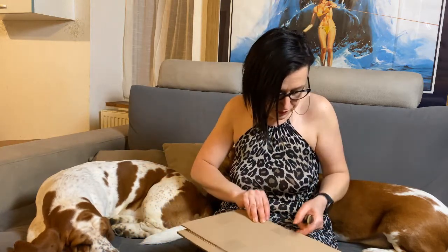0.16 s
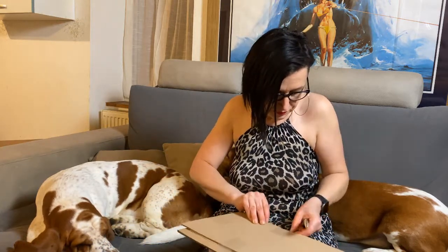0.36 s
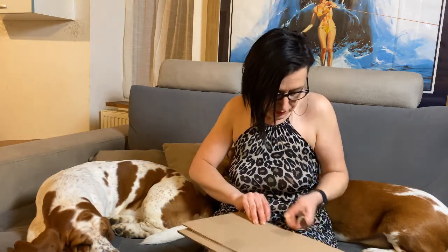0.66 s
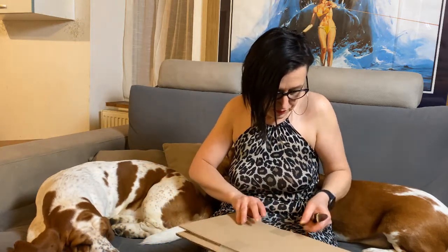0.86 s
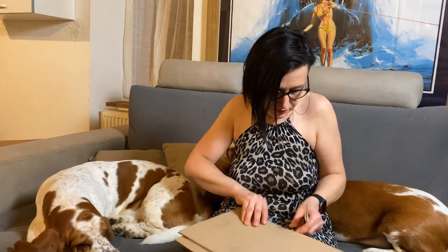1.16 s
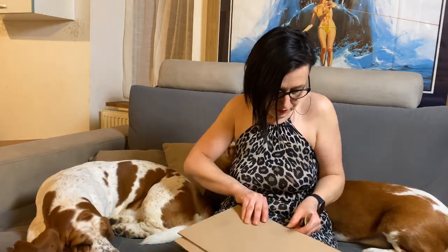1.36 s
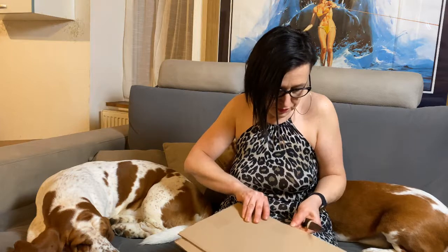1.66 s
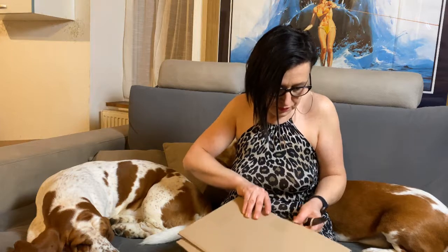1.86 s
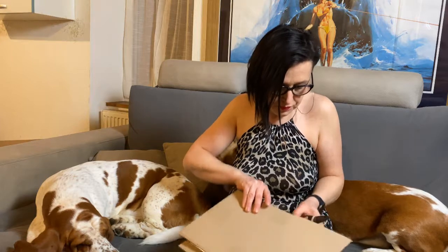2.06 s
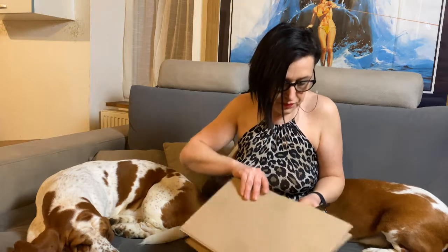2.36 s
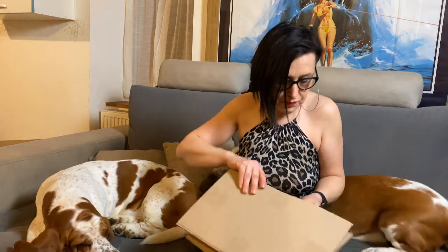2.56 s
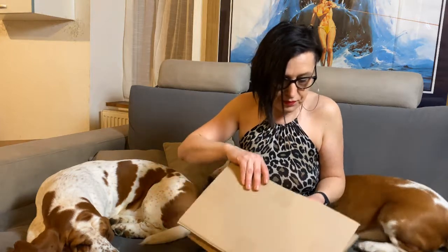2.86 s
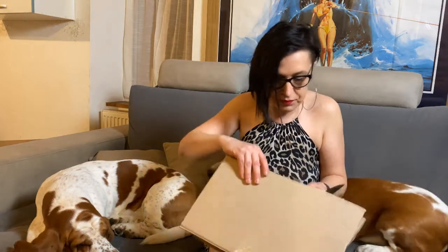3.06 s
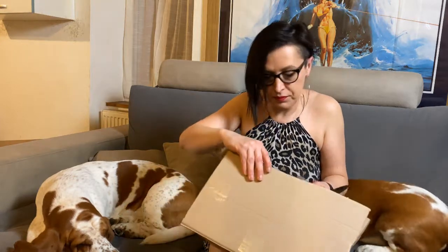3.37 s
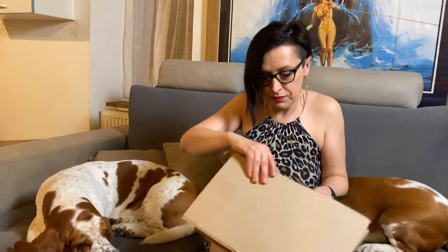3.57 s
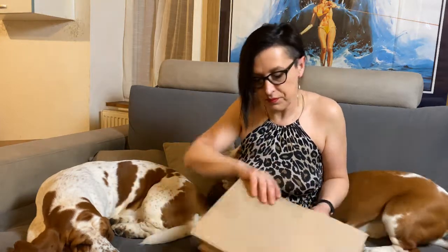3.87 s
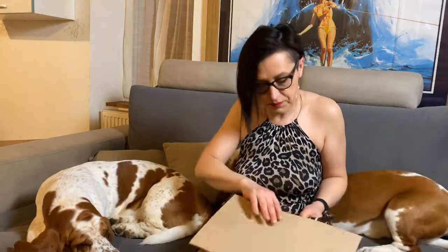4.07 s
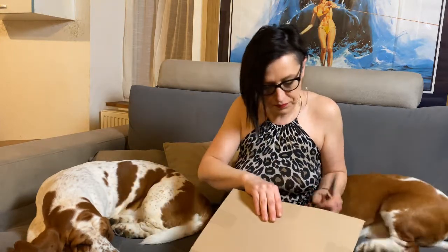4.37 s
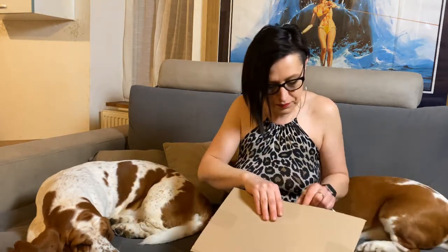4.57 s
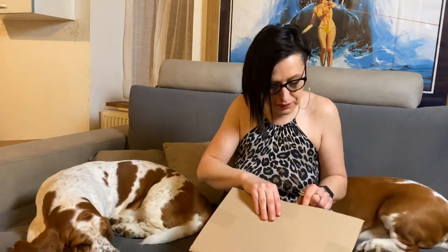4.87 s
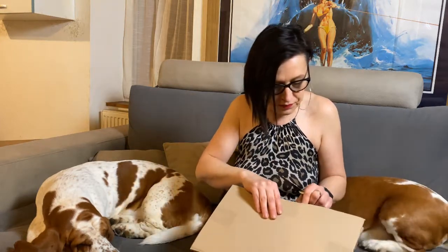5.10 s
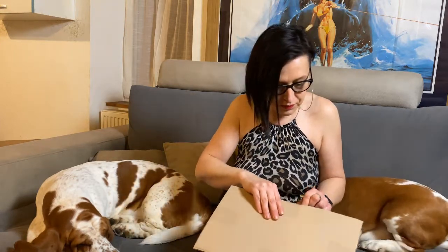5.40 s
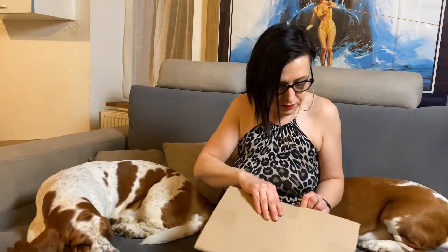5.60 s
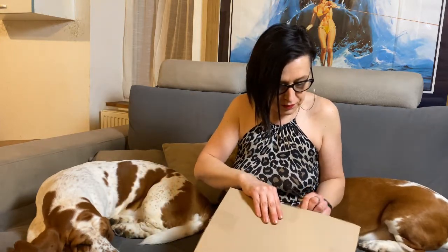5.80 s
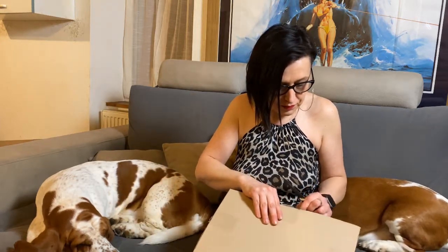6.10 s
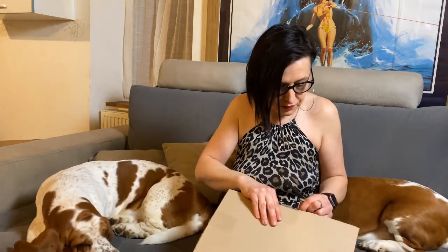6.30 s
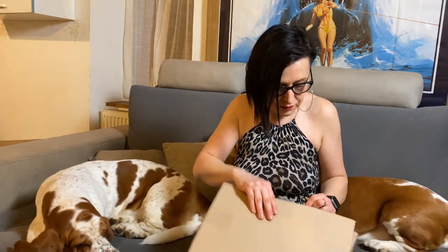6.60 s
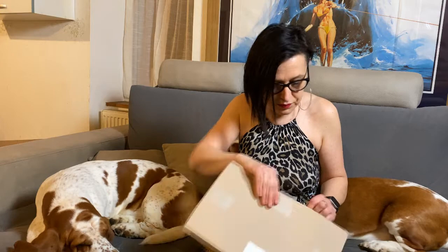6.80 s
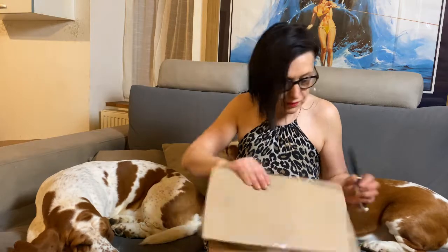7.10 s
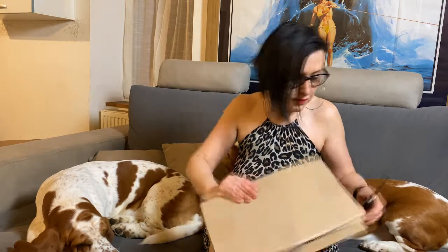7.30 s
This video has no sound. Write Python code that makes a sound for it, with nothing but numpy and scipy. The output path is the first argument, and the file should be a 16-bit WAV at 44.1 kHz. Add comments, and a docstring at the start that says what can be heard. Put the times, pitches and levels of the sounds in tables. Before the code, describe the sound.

A flat cardboard package is worked open on a lap. Small dry ticks lead to a sharp tape snap, then scraping and tearing grow into a busy, loud burst around two and a half seconds with low thumps. A quieter gap follows, then scattered rubs and hollow taps, and one strong woody pop late on. Soft-furnished living room, phone a metre or two away.

```python
"""Opening flat cardboard on the lap

A blade and fingers snap tape and fibres in a soft-furnished living room, a metre or two from a phone's microphones.
Snaps and rips are bursts and board rings; rubbing is clumped grains; flexing and the floor are coloured noise.
Air pockets pip and knees thump as fading sines; a near bounce, diffuse echo tails and two microphone ports follow."""
import sys
import numpy as np
from scipy import signal
from scipy.fft import rfft, irfft, next_fast_len
from scipy.io import wavfile

SR = 44100
rng = np.random.default_rng(int(sys.argv[2]) if len(sys.argv) > 2 else 0)


def output_pcm(signal):
    """Save a mono or channel-first signal as 16-bit PCM at the path in sys.argv[1].

    Samples are clipped to [-1, 1] before scaling.
    """
    pcm = np.clip(np.atleast_2d(signal).T, -1, 1) * 32767
    wavfile.write(sys.argv[1], SR, np.round(pcm).astype(np.int16))


N = 328545

FAVOUR_DB = 36   # loss per octave away from the favoured board mode


def from_db(db):
    """Decibels to gain."""
    return 10 ** (np.asarray(db) / 20)


def rms_one(x):
    """Scale to rms 1."""
    return x / np.sqrt(np.mean(x ** 2) + 1e-30)


def in_time(rows):
    """Interpolate the columns after the time column at every sample."""
    s, *columns = np.transpose(rows)
    return [np.interp(np.arange(N) / SR, s, c) for c in columns]


def at_hz(points, hz, order=1):
    """Read one column of a spectrum table on a log frequency axis."""
    points = np.array(points)
    return np.interp(np.log(np.maximum(hz, 1)), np.log(points[:, 0]), points[:, order])


def coloured(x, spectrum):
    """Filter x with a spectrum table and scale it to rms 1."""
    size = next_fast_len(N)
    gain = from_db(at_hz(spectrum, np.fft.rfftfreq(size, 1 / SR)))
    return rms_one(irfft(rfft(x, size) * gain, size)[..., :N])


def band(x, low_hz, high_hz):
    """Band-pass."""
    return signal.sosfilt(signal.butter(2, [low_hz, high_hz], "band", fs=SR, output="sos"), x)


def drift(rate_hz):
    """Slow random wander of rms 1, made at every 40th sample and interpolated."""
    r = np.exp(-2 * np.pi * rate_hz * 40 / SR)
    noise = rng.standard_normal(N // 40 + 2002)
    slow = signal.lfilter([1], [1, -2 * r, r * r], noise)[2000:]   # skip the filter's start
    return np.interp(np.arange(N) / 40, np.arange(len(slow)), rms_one(slow))


def ring(clicks, hz, t60_s):
    """A two-pole resonator: each unit click starts a fading sine of height 1."""
    r = from_db(-60 / (t60_s * SR))
    w = 2 * np.pi * hz / SR
    return signal.lfilter([0, np.sin(w)], [1, -2 * r * np.cos(w), r * r], clicks + 1e-18)


def add(out, s, sound):
    """Lay a sound into the track at s seconds."""
    i = max(round(s * SR), 0)
    out[..., i:i + sound.shape[-1]] += sound[..., :N - i]


def grains(per_s, spread_db, clump_db):
    """Tiny fibre slips as clicks at random moments, in clumps, of uneven size."""
    sizes = from_db(spread_db * np.minimum(rng.exponential(1, N), 5)) * rng.choice([-1, 1], N)
    draw = rng.random(N)
    chance = per_s * from_db(clump_db * drift(25)) / SR
    return sizes * (draw < chance)


# Strokes of sheet on sheet, levels before the rubbing trims; hum and hiss are relative to the rustle:
# peak_s, rustle_db, hum_db, hiss_db, rise_s, fade_s (rise and fade each span STROKE_RANGE_DB)
SHEET_STROKES = [(0.158, -54, -7, -25, 0.035, 0.042), (0.27, -54, 3, -23, 0.034, 0.11),
                 (0.509, -56, -7, -8, 0.015, 0.14), (0.612, -54, 5, -4, 0.015, 0.035),
                 (0.678, -56.5, 13.5, 8.5, 0.023, .06), (0.76, -34.5, -3.5, -15.5, 0.016, 0.066),
                 (0.982, -51.5, -13, -18, 0.26, 0.1), (1.155, -55, -5, -16.5, 0.13, 0.39),
                 (1.323, -53.5, -2, -20, 0.099, 0.15), (1.424, -48.5, -2.5, -21, .047, .035),
                 (1.519, -55.5, -2, -16, 0.024, 0.19), (1.62, -50, -3, 3, 0.021, 0.028),
                 (1.699, -36, -6, -14, .05, 0.11), (1.91, -48, -7, -10, 0.022, 0.35),
                 (2.01, -56, 1, -13, 0.022, 0.1), (2.147, -52, 4.5, -25, 0.029, 0.061),
                 (2.214, -40.5, -22, -12.5, 0.024, 0.087), (2.4, -45.5, -25, -18, .12, 0.42),
                 (2.53, -23.5, -6.5, -15.5, 0.035, 0.068), (2.578, -40.5, -7, -22, .05, 0.18),
                 (2.738, -51, -2, -11.5, 0.082, 0.19), (2.891, -45.5, -4, -17, 0.03, 0.047),
                 (3.297, -60, -7.5, -21.5, 0.01, 0.19), (3.394, -58.5, -17, -18.5, .01, 0.3),
                 (3.57, -56.5, -31.5, -31, .027, 0.061), (3.72, -60, -8, -8, .03, 0.073),
                 (3.896, -57, 3.5, -4, 0.13, 0.26), (3.974, -53.5, 8.5, -20, 0.039, 0.039),
                 (4.09, -39, 0.5, -33, 0.026, 0.062), (4.176, -35, -3.5, -20, 0.068, .035),
                 (4.666, -62.5, -1.5, -21.5, 0.21, .04), (4.779, -33.5, -5, -18, 0.026, 0.056),
                 (5.078, -52, 0, -29, 0.011, 0.035), (5.199, -39.5, -3, -22, 0.047, 0.019),
                 (5.292, -59.5, -13, -9.5, 0.022, 0.14), (5.535, -54, -5, -21, .1, 0.15),
                 (5.619, -57.5, -4.5, -21, 0.019, .055), (5.865, -46.5, -7, -15.5, 0.067, 0.15),
                 (6.09, -52.5, -8, -16, .15, 0.11), (6.147, -42, -12.5, -16.5, 0.019, 0.13),
                 (6.373, -54, -16, -23, .05, 0.046), (6.427, -56, -7, -11.5, 0.028, 0.47),
                 (6.61, -37.5, -2, -11, 0.027, 0.12), (6.768, -47.5, -4, -26, 0.024, 0.17),
                 (6.86, -41.5, -14, -17, .035, 0.09), (6.89, -50, -2, -19, .05, 0.079),
                 (7.074, -49.5, -2.5, -19, .05, 0.42), (7.146, -56, -12, -15.5, 0.26, 0.023),
                 (7.314, -52, -11, -22.5, .012, 0.18), (7.44, -52.5, -23.5, -18, 0.036, .1)]
# Hands at work between strokes, levels before the rubbing trims; the hum centre is where the board is held:
# time_s, rustle_db, hum_centre_hz
HAND_WORK = [(0.0, -66.5, 630), (0.49, -67, 730), (0.75, -73, 950), (1.07, -66.5, 635), (1.49, -85, 730),
             (1.85, -61.5, 830), (2.2, -63, 1220), (2.48, -43, 960), (2.7, -64, 1120), (2.96, -56, 760),
             (3.23, -62, 1155), (3.3, -71.5, 984), (3.66, -85, 700), (3.76, -57.5, 960), (4.07, -51.5, 835),
             (4.29, -48.5, 900), (4.43, -55, 626), (4.51, -80, 600), (4.73, -88, 910), (4.85, -55, 1017),
             (5.1, -61.5, 905), (5.28, -55.5, 990), (5.77, -74.5, 800), (5.98, -69, 842), (6.32, -73, 980),
             (6.56, -68, 1050), (6.75, -56, 810), (7.04, -65, 797), (7.15, -61.5, 857), (7.2, -88, 720),
             (7.3, -74, 760), (7.45, -64, 890)]
STROKE_RANGE_DB = 20
STROKES_END_S, END_FADE_S = 7.15, 0.023   # earlier strokes die away quickly from here
HANDLING_HUM_DB, HANDLING_HISS_DB = -7, -20   # relative to the handling rustle


def rub_levels():
    """Rustle, hum and hiss in dB: rising and fading strokes add their power to the handling."""
    t = np.arange(0, N, 44) / SR   # coarse steps, about 1 ms
    s, db, hum_db, hiss_db, rise, fade = np.transpose(SHEET_STROKES)[:, :, None]
    rising = (s - t) / np.maximum(rise, .004)
    fading = (t - s) / np.maximum(fade, .004)
    shape_db = db - STROKE_RANGE_DB * np.where(t < s, rising, fading)
    ending = np.maximum(t - STROKES_END_S, 0) / END_FADE_S
    shape_db = shape_db - STROKE_RANGE_DB * (s < STROKES_END_S) * ending
    power = [np.sum(from_db(shape_db + part_db) ** 2, axis=0) for part_db in (0, hum_db, hiss_db)]
    strokes = [np.interp(np.arange(N) / SR, t, p) for p in power]
    parts_db = np.array([[0], [HANDLING_HUM_DB], [HANDLING_HISS_DB]])
    handling = from_db(in_time(HAND_WORK)[0] + parts_db) ** 2
    return 10 * np.log10(handling + strokes)


# Modes of the cardboard sheet: mode_hz, level_db, t60_s
BOARD_MODES = [(330, -17, 0.073), (467, 7.5, 0.015), (610, 4, 0.035), (815, -2, 0.035), (989.5, 0, 0.031),
               (1187, 4, 0.02), (1474, 1, 0.025)]
# Relative colour of the rubbing rustle: frequency_hz, level_db
RUSTLE_COLOUR = [(590, -33.5), (1000, -12), (1220, -8), (1680, -6), (2240, 0), (2840, -6), (3620, -4.5),
                 (4850, -8.5), (7000, -18), (9100, -35), (15400, -120)]
HUM_RING = .6   # share of the ring time left under the fingers


def rubbing(rustle_db, hum_db, hiss_db):
    """Dense slips rustle and hiss, lone fibres crackle, sparser slips knock modes near the hold."""
    hum_hz = in_time(HAND_WORK)[1]
    slips = grains(3000, spread_db=0.5, clump_db=4.5)
    rustle = coloured(slips, RUSTLE_COLOUR) * from_db(rustle_db - 6.0 + 2.8 * drift(6.7))
    fine_slips = slips + grains(5000, spread_db=-2.0, clump_db=6.0)
    hiss = rms_one(band(fine_slips, 5300, 11000)) * from_db(hiss_db + 9.5)
    knocks = grains(900, spread_db=2.2, clump_db=5.0)
    hum = np.zeros(N)
    for k, (hz, mode_db, t60) in enumerate(BOARD_MODES):
        near_db = -FAVOUR_DB * np.abs(np.log2(hz / hum_hz))
        mode = rms_one(ring(np.roll(knocks, k), hz, HUM_RING * t60))
        hum += from_db(mode_db + near_db) * mode
    lone_fibres = grains(240, spread_db=3.5, clump_db=7.0)
    crackle = rms_one(band(lone_fibres, 750, 2500)) * from_db(rustle_db - 14.5)
    return from_db(-1.5) * (rustle + crackle + hiss + hum * from_db(hum_db - 6.5))


# The sheet flexing and pushing air: time_s, level_db
FLEX_LEVELS = [(0.0, -67.5), (0.77, -69), (1.0, -74.5), (1.31, -68), (1.72, -72.5), (1.84, -64),
               (2.45, -71.5), (2.59, -55), (2.76, -67.5), (2.86, -56.5), (3.11, -68.5), (3.46, -88.5),
               (3.9, -78), (4.23, -69), (4.42, -60.5), (4.54, -65.5), (4.85, -77), (5.23, -73.5),
               (6.0, -82.5), (6.49, -75.5), (6.6, -56.5), (6.81, -59), (7.14, -77), (7.45, -67.5)]
# Relative colour of the flexing noise: frequency_hz, level_db
FLEX_SPECTRUM = [(15, -19.5), (25, -33), (59, -2.5), (114, -4), (314, -11), (370, -15.5), (500, -13),
                 (650, -39.5), (1100, -120)]


def flexing():
    """The moving sheet pushes air: low noise with a lumpy level."""
    air = coloured(rng.standard_normal(N), FLEX_SPECTRUM)
    return air * from_db(in_time(FLEX_LEVELS)[0] + 4.8 * drift(8.9))


# Relative colour of the quiet room and microphone noise: frequency_hz, level_db
FLOOR_COLOUR = [(15, -36.5), (25, -0.5), (112, -18), (213, -9), (335, -11), (637, -8), (1060, -19.5),
                (3830, -24.5), (8550, -43.5), (15000, -42)]
FLOOR_DB = -74   # rms ahead of the microphone response


def quiet_floor():
    """Steady room and microphone noise, partly shared by left and right."""
    shared, own = rng.standard_normal(N), rng.standard_normal((2, N))
    return from_db(FLOOR_DB) * coloured(shared + 1.8 * own, FLOOR_COLOUR)


# Centre levels of a small snap's parts, relative to its peak: upper_crack_db, board_ring_db, knock_db, tick_db
SMALL_SNAP_PARTS = (-4, -8, -24.5, -21)
SMALL_OVER_RUSTLE_DB, SMALL_SPREAD_DB = 3.5, 2   # snap level over rustle level, both before their trims


def small_snaps(rustle_db, count):
    """Small releases at random moments, in the columns of TAPE_SNAPS, following the rustle level."""
    when, low, high = rng.random((count, 3)).T
    size, *parts = rng.standard_normal((count, 5)).T
    at = (when * N).astype(int)
    parts_db = np.array(SMALL_SNAP_PARTS)[:, None] + 6 * np.array(parts)
    upper_db, ring_db, knock_db, tick_db = parts_db
    db = rustle_db[at] + SMALL_OVER_RUSTLE_DB + SMALL_SPREAD_DB * size
    crack_hz, upper_hz = 1600 * 2 ** low, 3250 + 1200 * high
    ring_hz = in_time(HAND_WORK)[1][at]
    return np.transpose([at / SR, db, crack_hz, upper_hz, upper_db, ring_db, ring_hz, knock_db, tick_db])


# Tape and fibres letting go; level before a 4.5 dB boost, middle levels relative to it:
# start_s, level_db, crack_hz, upper_crack_hz, upper_crack_db, board_ring_db, ring_centre_hz, knock_db, tick_db
TAPE_SNAPS = [(0.0667, -51, 2700, 3180, -19, -11, 675, -3, -39),
              (0.2902, -44.5, 2120, 4320, -16, 0.5, 732, -9, -24),
              (0.3102, -45, 2500, 3560, -10, -9, 725, -23, 6),
              (0.405, -42.5, 2320, 3880, 13, -13, 697, -42, -40),
              (0.5092, -36, 2920, 3830, -28, -23, 1510, -40, -20),
              (0.5302, -41, 2310, 3310, -11, -23, 1490, -33, -23),
              (0.6023, -31.5, 2320, 3450, -24, -15, 616, -4, -10),
              (0.6615, -11.5, 2680, 3330, -14, -22.5, 706, -50, -8),
              (0.7218, -35, 2940, 4220, -8, -18, 1480, -34, -17),
              (0.7465, -32, 1730, 3920, 4.5, -26, 970, -19, 4),
              (1.144, -37.5, 2050, 3930, 5.5, -11.5, 695, -29, -30),
              (1.2288, -50.5, 2810, 3100, 1, -24, 605, -18, -29),
              (1.273, -44.5, 2900, 4070, -2, -20, 710, -26, -26),
              (1.514, -47, 2780, 3570, 0, -27, 720, -24, -30),
              (1.5567, -39, 3230, 3730, -3, -32, 775, -35, 1),
              (1.6079, -19.5, 3430, 4470, -0.5, -30, 1010, -38, -7),
              (1.673, -17.5, 1690, 4580, 11, -10.5, 1528, -4.5, 2),
              (1.8974, -41, 1450, 4450, 9, -2.5, 897, -23, 13),
              (1.9283, -47, 3020, 3340, 11, -22, 1470, -16, -10),
              (1.9619, -34.5, 3200, 3670, -1, -5, 1504, -7, -31),
              (1.969, -27.5, 3180, 3270, -2, -23, 1500, -34, -20),
              (1.9996, -19.5, 2190, 3840, 3.5, -23, 1460, -20.5, -42),
              (2.054, -38, 2600, 3880, 0, -25, 1300, -30, -15),
              (2.0895, -34.5, 2750, 3870, -17, -25, 1314, -22, -23),
              (2.1317, -37, 1620, 3900, -23, -1, 1560, -37, -29),
              (2.2012, -30, 2420, 3790, -14, -30, 1310, -37, -3),
              (2.2138, -27, 1910, 3400, -20, -47, 1480, -23, -36),
              (2.2886, -41, 2040, 4200, -18, 0.5, 1020, -5, -23),
              (2.3057, -43, 1770, 3900, -17, -11, 1180, -23, -28),
              (2.3645, -41, 1730, 3760, -16, -7, 825, -39, -32),
              (2.389, -25, 1820, 4600, 5, -10, 1150, -43, -5),
              (2.4325, -33, 3220, 3250, -10, -10, 1490, -30, 3),
              (2.4906, -25.5, 1900, 3540, -12, -27, 925, -36, -20),
              (2.5074, -10.5, 1850, 4270, -10, -2.5, 1393, -41, -4),
              (2.523, -21, 1500, 4200, -9, -9, 1260, -31.5, -22),
              (2.5411, -27.5, 2270, 4300, 9, -1, 1355, -29, -21),
              (2.7028, -39, 2620, 3960, -26, -20, 1140, -18, 1),
              (2.7411, -36, 1640, 3490, -15, -7.5, 1420, -18, -25),
              (2.8698, -32.5, 2100, 4100, -14, -4.5, 1220, -9.5, -27),
              (2.9504, -47, 1760, 3960, -23, -11.5, 821, -10, -36),
              (3.2313, -47.5, 2570, 3770, -26, -4, 1510, -31, -42),
              (3.2963, -50, 1550, 5000, -15, -9.5, 1210, -25, -30),
              (3.3957, -47.5, 2690, 4470, 3, -9, 1400, -23.5, -28),
              (3.551, -38.5, 2120, 3720, -9.5, -29, 1480, -35, -38),
              (3.712, -55.5, 1860, 5150, 1, -16, 1500, -37.5, 15.5),
              (3.773, -47, 1700, 4080, -25, -2, 816, -16, -16),
              (3.806, -44.5, 1480, 4030, -16, -0.5, 1140, -23, -27),
              (3.9644, -33, 1600, 4560, -26, -4, 820, -23, -29),
              (4.08, -33, 1690, 3200, -17, -12, 816, -6, -27),
              (4.1136, -32, 2150, 3720, 5.5, -21, 835, -24, -33),
              (4.142, -26, 1880, 6050, 2, -9, 1470, -13.5, -22),
              (4.1693, -24, 1620, 5300, 7, -12, 1370, -35, -1),
              (4.2273, -35.5, 2170, 3460, -14, -11.5, 830, -26, -24),
              (4.3685, -41.5, 1830, 3640, -18, -0.5, 806, -17, -29),
              (4.4161, -43, 1730, 3310, -15.5, 1.5, 1147, -2, -45),
              (4.6547, -51, 1895, 3270, 0.5, -23, 920, -31, 3),
              (4.7521, -35.5, 2610, 3900, -16.5, -13.5, 926, -11, 5.5),
              (4.774, -26, 2770, 4280, -11.5, -20, 914, -27, -23),
              (5.031, -43, 2180, 6000, -11, -6.5, 1050, -27, -26),
              (5.0771, -49.5, 1510, 3600, 8, -3, 1490, -3, -31),
              (5.099, -46, 1940, 3640, -4, -23, 1480, -25, -35),
              (5.1844, -32, 2030, 3440, -4, 2, 897, -18, -36),
              (5.2943, -49, 2170, 4080, 7, -13, 980, -21, -15),
              (5.3784, -48, 1750, 3350, -24, -24, 1450, -13, -29.5),
              (5.521, -41, 1810, 3620, 3.5, -6, 790, -37, -33),
              (5.6181, -47, 2290, 3700, -7, -14, 830, -25.5, -20.5),
              (5.8631, -35, 2080, 4000, -19, 1.5, 823, -26, -29.5),
              (5.9266, -35, 2840, 4080, 1, -11, 1250, -37, -37),
              (6.0376, -41.5, 2300, 4100, -1, -19, 805, -35, -7),
              (6.0435, -45, 2600, 4000, 3, -17, 850, -32, -20),
              (6.088, -48, 2900, 3500, -3, -24, 850, -33, 3),
              (6.0965, -41, 1810, 3800, -2, -14, 820, -31, 2),
              (6.1394, -27.5, 2170, 4000, -15, -22, 950, -31, 0),
              (6.1789, -37, 2060, 4430, -13, -11, 1500, -37, -25),
              (6.1873, -37, 2160, 3640, -21, -10, 1240, -38, -27),
              (6.2876, -42.5, 2230, 4000, -22, -22, 680, -34, -35),
              (6.34, -44, 3200, 4160, 2.5, -15, 1400, -20, -28),
              (6.369, -46, 2300, 3600, -2, -18, 930, -30, -10),
              (6.3764, -37, 3120, 3930, 8.5, -31, 920, -31, -37),
              (6.419, -40.5, 2980, 3800, 5.5, -12, 966, -28, 6),
              (6.4475, -48.5, 2080, 3290, 5, -24, 939, -28, -7),
              (6.4992, -43.5, 2060, 4080, -11, -10, 980, -18, -22),
              (6.5171, -46, 3130, 3960, 6, -17, 930, -29, -20),
              (6.5607, -43.5, 2210, 3300, 5, -5, 1335, -18, -23),
              (6.5863, -14, 1470, 3380, -1.5, 4, 955, -10.5, -4),
              (6.7695, -43, 2210, 3720, -15, -5, 797, -17, -20),
              (6.843, -34.5, 2290, 3620, -3, -16, 754, -25, -3),
              (7.0486, -39.5, 2340, 3470, -15.5, -6, 795, -28, -34),
              (7.0751, -38.5, 2600, 3410, -25.5, -14.5, 807, -20.5, -24.5),
              (7.3177, -50, 2360, 3580, -6, -4, 826, -19.5, -19),
              (7.3464, -44, 2920, 3900, -15.5, -4, 798, -22.5, -23),
              (7.3824, -38, 2750, 3640, -24, -6, 1320, -27, -30)]
KNOCK_TOP_HZ = 560      # board modes up to here take the low knock level
SNAP_SCATTER_DB = 0.5   # spread of the left-right level difference


def snaps(releases):
    """Each release is a short ragged crack, a treble tick and a blow into the board's modes."""
    out, t = np.zeros((2, N)), np.arange(2600) / SR
    short = t[:600]
    count = len(BOARD_MODES)
    modes_hz, modes_db, modes_t60 = np.transpose(BOARD_MODES)[:, :, None]
    for s, db, hz, upper_hz, upper_db, ring_db, ring_hz, knock_db, tick_db in releases:
        strength, bend = rng.standard_normal((2, count, 1))
        noise = rng.standard_normal(600)
        pan_db = SNAP_SCATTER_DB * rng.standard_normal()
        # the cracks die by 60 dB in 13 and 19 cycles
        tone = np.sin(2 * np.pi * hz * short) * from_db(-60 * short * hz / 13.0)
        upper_fade = from_db(upper_db - 60 * short * upper_hz / 19.0)
        tone += upper_fade * np.sin(2 * np.pi * upper_hz * short)
        ragged = 0.73 * band(noise * from_db(-60 * short / 0.022), 0.73 * hz, 1.363 * upper_hz)
        tick = from_db(tick_db) * band(noise[::-1] * from_db(-60 * short / 0.0085), 5700, 8300)
        # the place of the blow favours some modes
        near_db = -FAVOUR_DB * np.abs(np.log2(modes_hz / ring_hz))
        level_db = np.where(modes_hz > KNOCK_TOP_HZ, ring_db + near_db, knock_db)
        fade = from_db(modes_db + level_db + 1.8 * strength - 60 * t / modes_t60)
        # the bent sheet retunes until its nearest mode sits at the ring centre
        pull = ring_hz / modes_hz[np.argmax(near_db)]
        bent_hz = modes_hz * pull * (1 + 0.064 * bend * (near_db < near_db.max()))
        rise = 1 - np.exp(-(t * modes_hz / 1.2) ** 2)   # slow bending waves: low modes speak later
        board = np.sum(fade * rise * np.sin(2 * np.pi * bent_hz * t), axis=0)
        sound = from_db(-1.0) * board
        sound[:600] += (tone + ragged + tick) * (1 - np.exp(-short / 0.00034))
        add(out, s, from_db(db + 4.5) * sound * from_db([[pan_db / 2], [-pan_db / 2]]))
    return out


# Short runs of tearing, level before a 15.5 dB cut: start_s, level_db, centre_hz, hold_s
TEARING_RUNS = [(0.264, -35.5, 2970, 0.028), (0.531, -40.5, 2350, 0.027), (0.598, -30.5, 3570, 0.022),
                (0.751, -25, 1700, 0.01), (0.914, -47, 660, 0.055), (1.292, -39, 940, 0.036),
                (1.666, -6.5, 746, 0.0018), (1.9, -26.5, 744, 0.003), (1.946, -24.5, 3280, 0.025),
                (2.127, -36, 1700, 0.012), (2.143, -35.5, 1094, 0.01), (2.197, -31, 2000, 0.024),
                (2.382, -23.5, 4440, 0.01), (2.496, -23, 1430, 0.041), (2.541, -18.5, 2290, 0.0097),
                (2.733, -33, 504, 0.018), (2.871, -28.5, 1140, 0.0048), (3.801, -39.5, 1180, 0.021),
                (3.926, -41, 720, 0.018), (4.105, -28, 3890, 0.027), (4.359, -36.5, 840, 0.019),
                (4.738, -38.5, 2600, 0.04), (4.755, -45, 980, 0.068), (4.922, -40, 1500, 0.023),
                (5.171, -40.5, 885, 0.0043), (5.852, -25, 780, 0.011), (5.871, -38, 870, 0.024),
                (6.134, -37, 2740, 0.013), (6.575, -23.5, 970, 0.019), (7.05, -41, 830, 0.016)]
RIP_SWELL_S, RIP_T60_S = 0.0072, 0.053


def rips():
    """A run of fibres breaking: crackle that swells, holds and fades, broad around its centre."""
    out, t = np.zeros(N), np.arange(SR // 4) / SR
    crackle = grains(3500, spread_db=3.5, clump_db=4.0)
    for s, db, hz, hold in TEARING_RUNS:
        run = np.roll(crackle, -round(s * SR))[:len(t)]
        run = rms_one(band(run, hz / 2.26, hz * 1.81) + 1.1 * band(run, 300, 7000))
        swell = np.minimum(t / RIP_SWELL_S, 1) ** 3
        fade = from_db(-60 * np.maximum(t - RIP_SWELL_S - hold, 0) / RIP_T60_S)
        add(out, s, from_db(db - 15.5) * swell * fade * run)
    return out


# The sheet thumping on the knees; the falling front is relative to level_db:
# start_s, level_db, pitch_hz, t60_s, front_db
KNEE_THUMPS = [(0.602, -50, 157, 0.2, -16.5), (0.756, -39.5, 172.4, 0.12, -3), (1.138, -53, 149, 0.11, -15),
               (1.672, -52, 123.4, 0.17, -10.5), (1.88, -45, 114, 0.17, 0), (1.928, -40.5, 52, 0.26, -15),
               (2.145, -65, 121, 0.22, -3), (2.298, -39, 113.2, 0.31, -5), (2.507, -38, 204, 0.26, 10.5),
               (2.547, -33.5, 85.4, 0.2, 7.5), (2.756, -41, 119.6, 0.15, -1), (2.799, -33.5, 68, 0.13, -22),
               (2.879, -59, 193, 0.22, 5.5), (2.931, -45.5, 224, 0.083, 1.5), (4.312, -48, 99, 0.12, 0),
               (4.421, -37, 104.4, 0.25, -2), (4.783, -47, 95.5, 0.21, -29), (5.222, -52, 176.5, 0.21, -12),
               (5.842, -42.5, 117, 0.14, 0.5), (6.587, -34, 156, 0.14, -11.5),
               (6.898, -45.5, 78.8, 0.24, -2.5), (7.328, -51.5, 168, 0.16, -4.5)]
THUMP_RISE_CYCLES = .95


def thumps():
    """A soft blow: a front falling in pitch (fast waves arrive first), a low mode and two neighbours."""
    out, t = np.zeros(N), np.arange(SR // 2) / SR
    lumps = drift(90)
    for s, db, hz, t60, front_db in KNEE_THUMPS:
        fade = from_db(-60 * t / t60) * (1 - np.exp(-t * hz / THUMP_RISE_CYCLES))
        modes = np.sin(2 * np.pi * hz * t)
        modes += 0.49 * np.sin(2 * np.pi * .62 * hz * t)
        modes += 0.27 * np.sin(2 * np.pi * 1.6 * hz * t)
        front_hz = hz + 900 * np.exp(-t / 0.0064)
        front = np.sin(2 * np.pi * np.cumsum(front_hz) / SR)
        front *= from_db(front_db - 60 * t / 0.065) * (1 - np.exp(-t / 0.0035))
        front *= 1 + 0.92 * np.roll(lumps, -round(s * SR))[:len(t)]   # an uneven contact
        add(out, s - .006, from_db(db) * front)
        add(out, s, from_db(db) * fade * modes)
    return out


# Hollow pips of the air pocket between the sheets: start_s, level_db, pitch_hz
AIR_PIPS = [(3.812, -44, 820), (3.859, -44.5, 710), (3.93, -45.5, 720), (3.967, -42.5, 784),
            (4.001, -43.5, 835), (4.042, -41, 814), (4.079, -50.5, 760), (4.136, -47, 816),
            (4.17, -33.5, 613), (4.221, -52, 705), (4.368, -52.5, 817), (4.415, -49.5, 868),
            (4.754, -47, 920), (4.775, -40, 910), (4.935, -52.5, 990), (5.186, -37, 802), (5.843, -42, 800),
            (5.866, -31, 896), (6.004, -55, 844), (6.027, -51, 860), (6.139, -39.5, 890),
            (6.561, -55, 1040), (6.587, -13.5, 985), (6.67, -40, 784), (6.767, -50, 780), (6.841, -48, 720),
            (6.863, -48, 770), (6.902, -45, 781), (6.925, -50.5, 774), (6.971, -44, 805),
            (7.002, -47.5, 799), (7.05, -53.5, 834), (7.309, -51.5, 830), (7.332, -40.5, 795)]
PIP_T60_S = 0.042


def pips():
    """The pocket is squeezed and sings a soft, quickly fading sine."""
    out, t = np.zeros(N), np.arange(3000) / SR
    for s, db, hz in AIR_PIPS:
        shape = from_db(db - 60 * t / PIP_T60_S) * (1 - np.exp(-t / 0.0016))
        add(out, s, shape * np.sin(2 * np.pi * hz * t))
    return out


def near_bounce(lap):
    """One band-limited bounce off a surface close by, 8.8 ms late, added in place."""
    add(lap, 0.0088, from_db(-16) * band(lap, 800, 5500))


# Living-room echo by frequency; likeness is left-right, 0 to 1: frequency_hz, t60_s, level_db, likeness
ROOM_ECHO = [(60, 0.37, -2.5, .9), (300, 0.28, 1.5, 0.32), (1020, 0.34, 0, 0.18), (3000, 0.32, -1, 0.9),
             (8050, 0.28, 1.5, .1), (14000, 0.22, 3, 0.056)]
ROOM_DB = -4.5
ROOM_GAP_S = .008   # the tail opens from half to one and a half times this


def echo_tail():
    """Noise dying octave by octave after a short gap, its left-right likeness set by frequency."""
    t, tail = np.arange(SR // 3) / SR, 0
    noise = rng.standard_normal((2, len(t)))
    for hz in 50 * 2. ** np.arange(9):
        mid, side = band(noise, hz / np.sqrt(2), hz * np.sqrt(2))
        alike = np.clip(at_hz(ROOM_ECHO, hz, order=3), 0, 1)
        pair = np.sqrt(1 + alike) * mid + np.sqrt(1 - alike) * side * np.array([[1], [-1]])
        tail = tail + pair * from_db(at_hz(ROOM_ECHO, hz, order=2) - 60 * t / at_hz(ROOM_ECHO, hz))
    tail = tail * np.clip(t / ROOM_GAP_S - .5, 0, 1)
    return tail / np.sqrt(np.sum(tail ** 2) / 2)


def room(x):
    """Five diffuse echo tails take turns, cross-fading every third of a second, so no tone stands out."""
    tails, hop = [echo_tail() for k in range(5)], SR // 3
    out, padded = np.zeros((2, N + 4 * hop)), np.pad(x, (hop, 2 * hop))
    for k, i in enumerate(range(0, N + hop, hop)):
        piece = padded[i:i + 2 * hop] * signal.get_window("hann", 2 * hop)
        out[:, i:i + 3 * hop - 1] += signal.fftconvolve(piece[None], tails[k % 5], axes=1)
    return from_db(ROOM_DB) * out[:, hop:hop + N]


def scene():
    """Everything on the lap, its echoes, and the quiet floor."""
    levels_db = rub_levels()
    releases = np.concatenate([TAPE_SNAPS, small_snaps(levels_db[0], count=45)])
    lap = snaps(releases) + rips() + pips() + thumps() + rubbing(*levels_db) + flexing()
    floor = quiet_floor()
    near_bounce(lap)
    return lap + room(lap.mean(axis=0)) + floor


# Response shared by both microphone ports: frequency_hz, level_db
MIC_RESPONSE = [(20, -25.5), (35, -2), (100, 2), (4500, 0.5), (6500, -6), (9000, -13), (11500, -26.5),
                (15000, -28.5)]
# Left level minus right level: frequency_hz, difference_db
LEFT_RIGHT_BALANCE = [(60, 0), (110, -2), (200, -1.5), (380, -2), (700, -1.5), (1290, -1.0), (2380, 0.5),
                      (4400, 5.5), (8120, -2), (15000, -2)]
# Phase by which the left leads the right: frequency_hz, lead_rad
LEFT_RIGHT_PHASE = [(1000, -0.51), (2000, -0.74), (4000, -1.01), (8000, -1.75), (12000, -1.3)]
CUTOFF_HZ = 15600


def record(dry):
    """Two ports differ in colour and phase; the treble falls away and the top is cut."""
    size = next_fast_len(N + 4096)
    hz = np.fft.rfftfreq(size, 1 / SR)
    sides = np.array([[.5], [-.5]])
    gain = from_db(at_hz(MIC_RESPONSE, hz) + sides * at_hz(LEFT_RIGHT_BALANCE, hz))
    turn = np.exp(1j * sides * at_hz(LEFT_RIGHT_PHASE, hz))
    heard = irfft(rfft(dry, size) * gain * turn, size)[:, :N]
    return signal.sosfilt(signal.ellip(10, 1, 70, CUTOFF_HZ, fs=SR, output="sos"), heard)


dry = scene()
out = record(dry)
output_pcm(out)
```